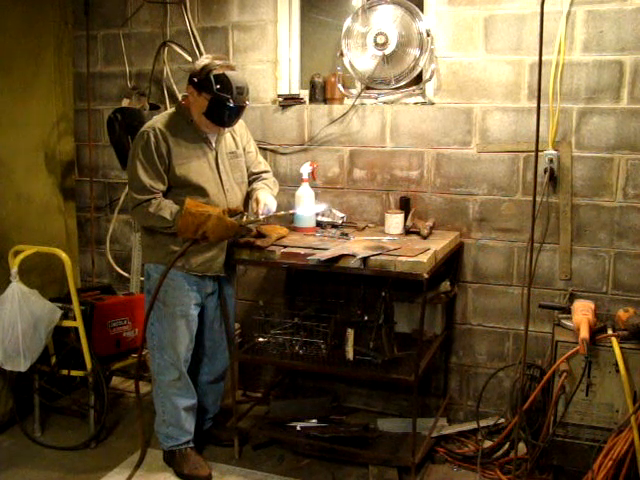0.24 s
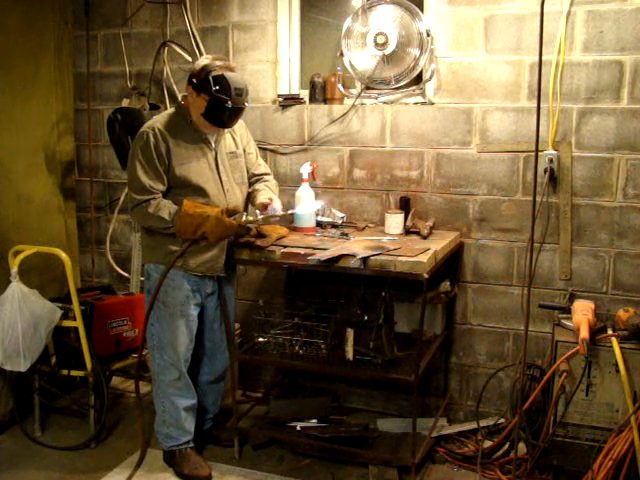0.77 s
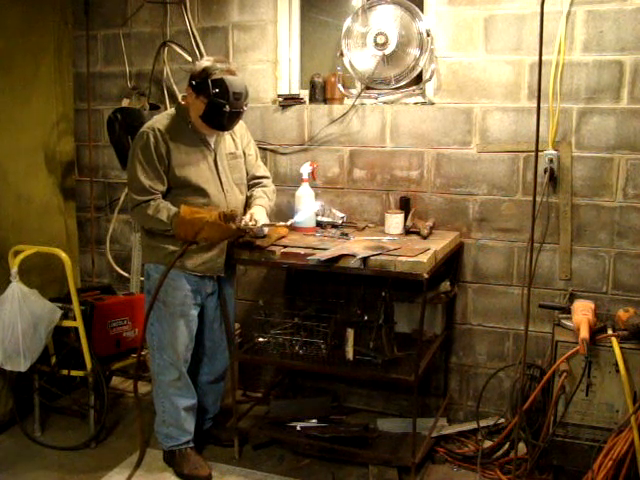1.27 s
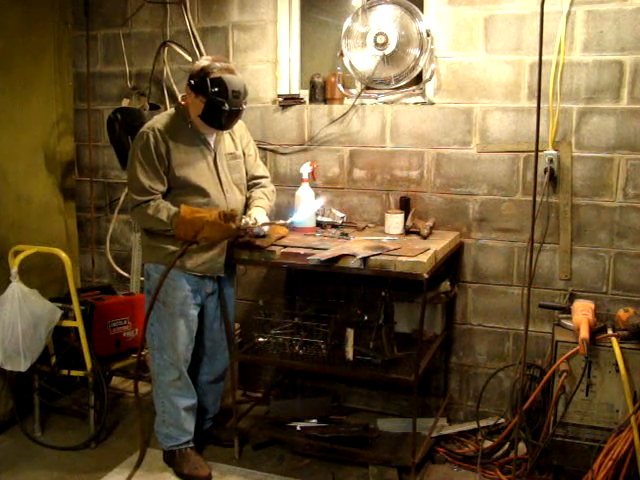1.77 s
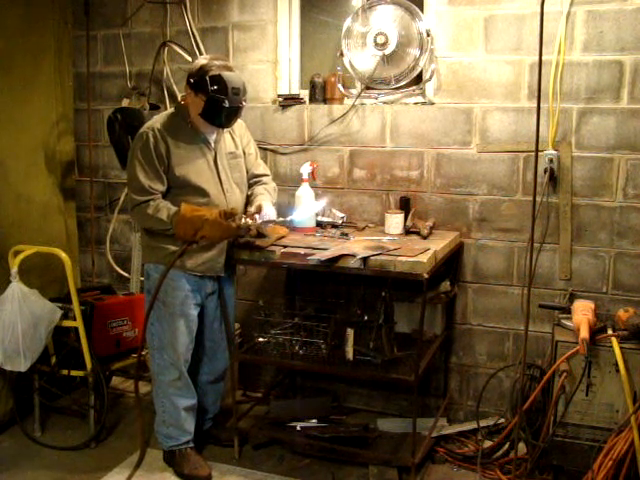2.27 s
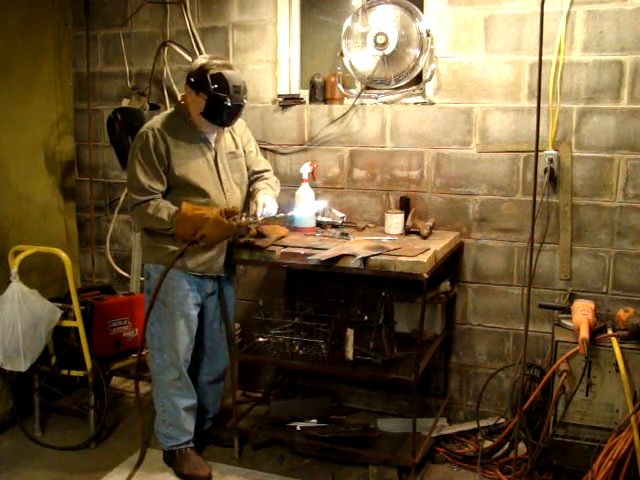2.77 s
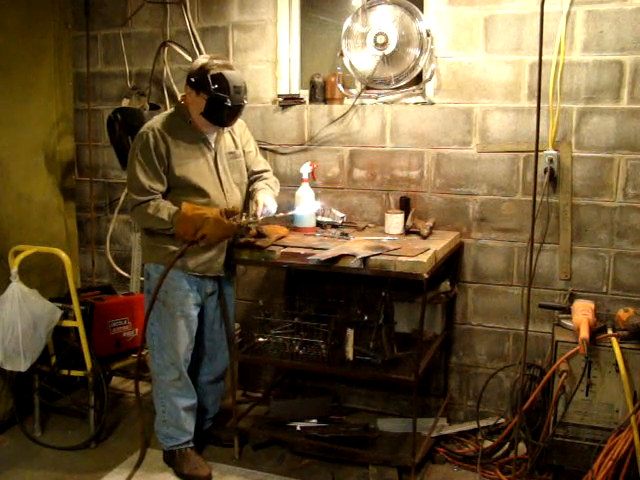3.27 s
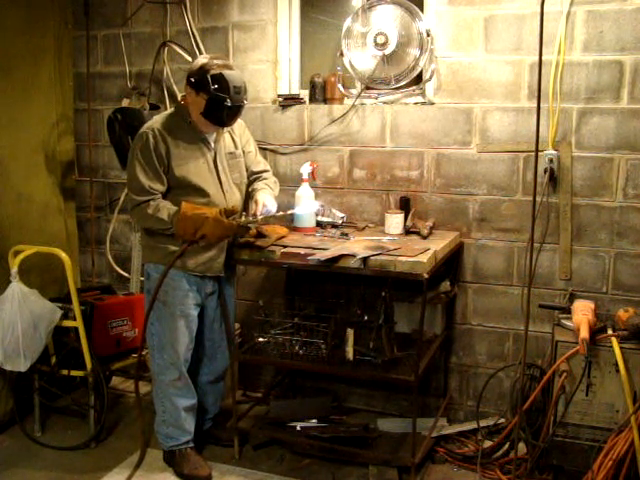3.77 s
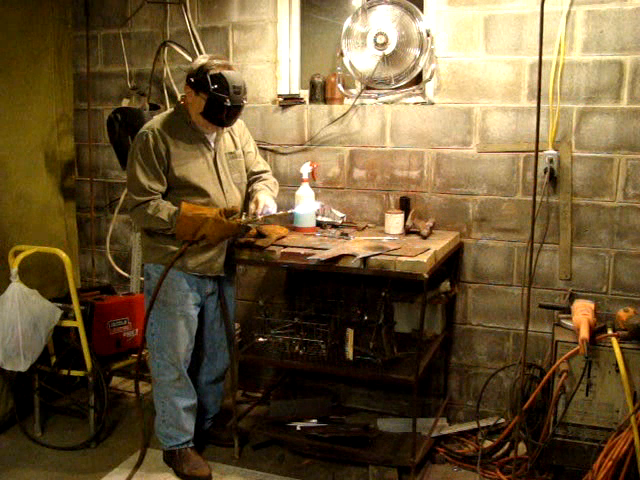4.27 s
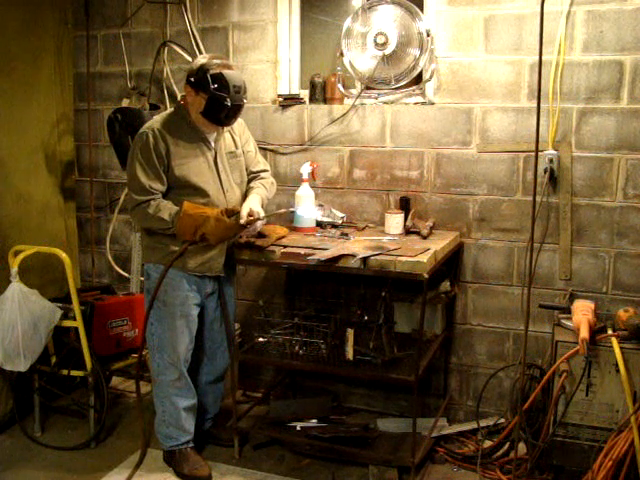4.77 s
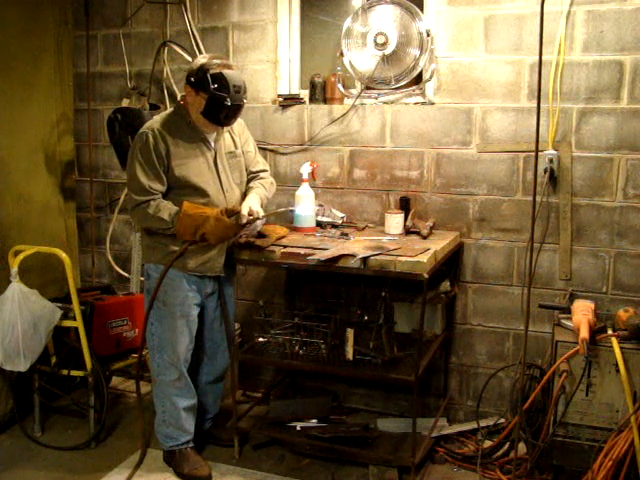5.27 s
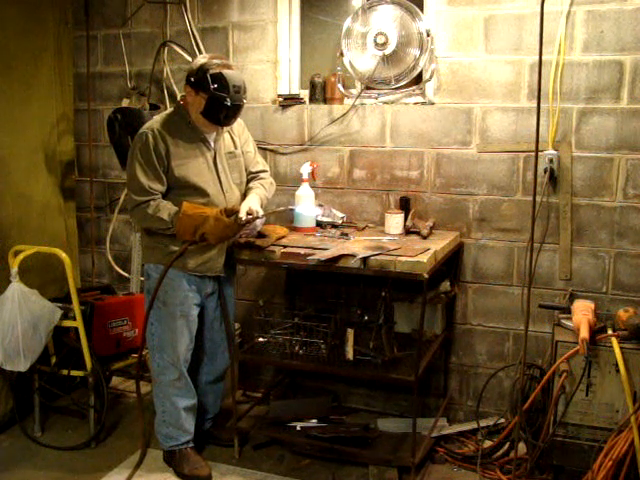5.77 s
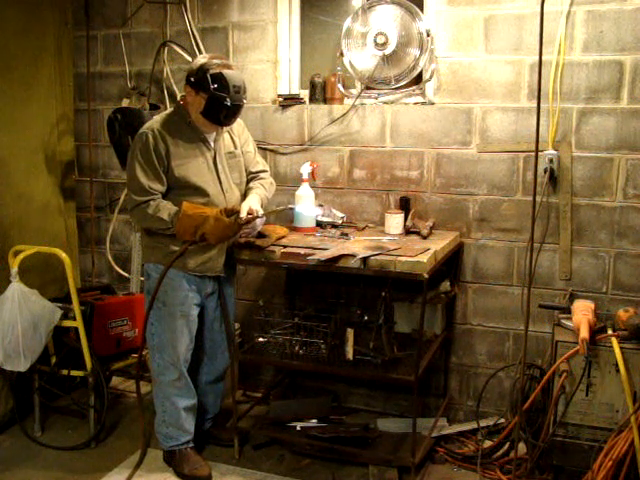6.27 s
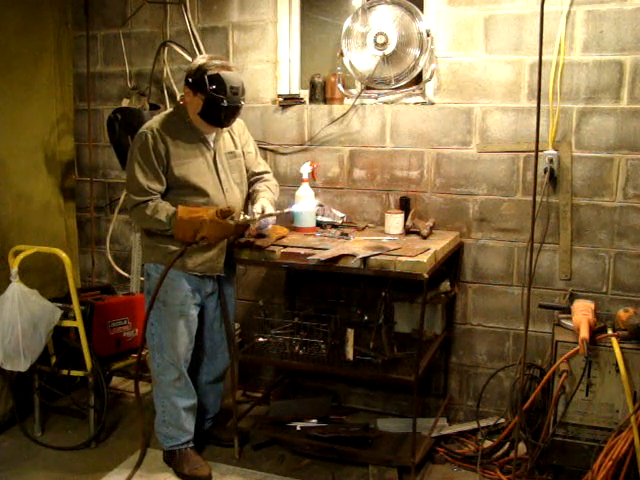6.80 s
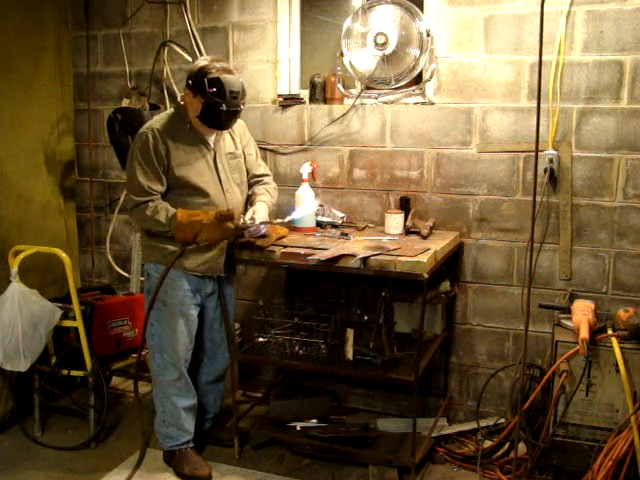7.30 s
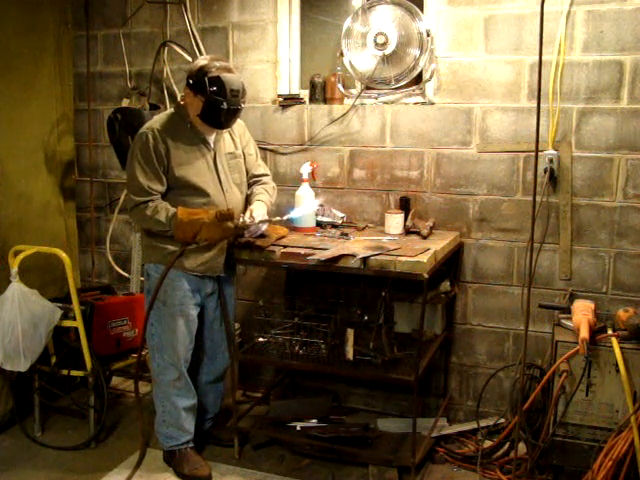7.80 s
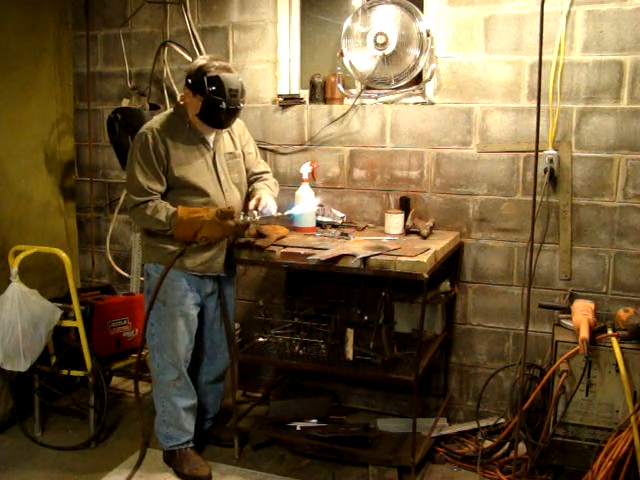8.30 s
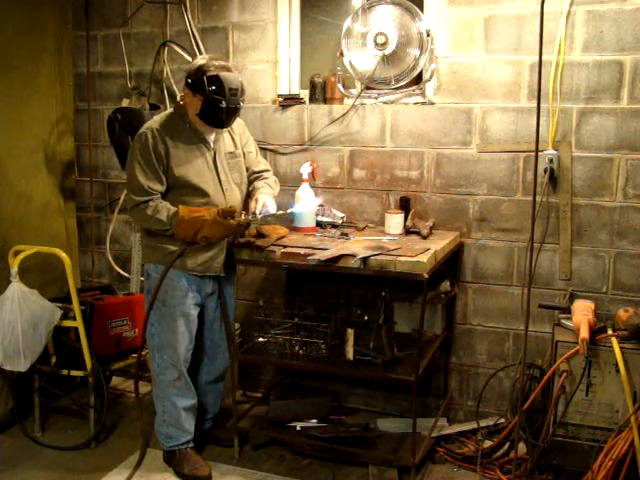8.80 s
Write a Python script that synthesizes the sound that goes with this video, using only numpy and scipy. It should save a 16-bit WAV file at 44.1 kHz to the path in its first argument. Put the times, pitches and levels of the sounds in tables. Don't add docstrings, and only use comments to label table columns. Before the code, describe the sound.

From 0 s a gas torch is already burning: a dense, bright nozzle hiss over a softer mid-range flame roar and little low rumble, wavering gently in level. A window fan sings one thin note near 790 Hz with a faint fluttering edge, clearest at the start, settling in the first two seconds and slowly fading; motor hum is barely present. Between about 3.15 and 3.6 s the flame grows fuller and rougher while the hiss hardly changes. Just before 5.0 s gas leaks briefly, then a harsh broadband blast snaps open until 5.23 s; a cleaner second blast runs from 5.44 to 5.67 s. Both shut abruptly. The steady burn continues, easing slightly toward 8.3 s and lifting again near 9 s. Block walls give short, boxy echoes; the distant camera microphone is nearly mono, dull at the very top, ducking under the blasts and recovering.

```python
import sys
import numpy as np
from scipy import signal
from scipy.fft import rfft, irfft, next_fast_len
from scipy.io import wavfile
from scipy.ndimage import uniform_filter1d, minimum_filter1d

SR = 44100
rng = np.random.default_rng(int(sys.argv[2]) if len(sys.argv) > 2 else 0)


def inscribe(sig):
    pcm = np.round(np.clip(np.atleast_2d(sig).T, -1, 1) * 32767)
    wavfile.write(sys.argv[1], SR, pcm.astype(np.int16))


def gain_from_db(level_db):
    decades = np.asarray(level_db, float) / 20
    return 10 ** decades


N = 399105
BLOCK = 40


def rms_one(x):
    return x / np.sqrt(np.mean(x ** 2) + 1e-20)


def in_time(rows):
    return np.interp(np.arange(N) / SR, *np.transpose(rows))


def rise(start_s, length_s):
    return np.clip((np.arange(N) / SR - start_s) / length_s, 0, 1)


def drift(rate_hz):
    pole = np.exp(-2 * np.pi * rate_hz * BLOCK / SR)
    settle = 2000
    noise = rng.standard_normal(N // BLOCK + 1 + settle)
    return rms_one(signal.lfilter([1], [1, -2 * pole, pole * pole], noise)[settle:])


def smooth_drift(rate_hz):
    return np.interp(np.arange(N) / BLOCK, np.arange(N // BLOCK + 1), drift(rate_hz))


def turbulence(spectrum, shared_db, own_db, rate):
    hz_points, db_points = np.transpose(spectrum)
    octaves = np.log2(hz_points[-1] / hz_points[0])
    edges = hz_points[0] * 2 ** np.arange(0, octaves + .2, 1 / 4)
    white = rng.standard_normal((2, N))
    gust = shared_db * drift(rate)
    out = 0
    for k, (low, high) in enumerate(zip(edges, edges[1:])):
        sos = signal.butter(2, [low, high], "band", fs=SR, output="sos")
        band = signal.sosfilt(sos, white[k % 2])
        level_db = np.interp(np.log(low * high) / 2, np.log(hz_points), db_points)
        gain = gain_from_db(level_db + gust + own_db * drift(rate))
        out = out + np.repeat(gain, BLOCK)[:N] * band
    return rms_one(out)


def basement(x):
    # f/Hz, width/Hz, lift/dB
    room_peaks = [(144, 13, 4.5), (280, 48, 5), (736, 25, -4.5), (497, 120, 6), (656, 66, 10.5),
                  (798, 98, 7.5), (1089, 30, 4.5), (1742, 51, -1), (1910, 110, 0), (2560, 29, 5.5),
                  (4800, 240, 2.5), (620, 15, -4)]
    t60_s, echo_db, stances = .2, -5.5, 9
    size = next_fast_len(N + SR // 2)
    hz = np.fft.rfftfreq(size, 1 / SR)
    lift_db = sum(db / (1 + (2 * (hz - centre) / width) ** 2) for centre, width, db in room_peaks)
    lifted = rfft(x, size) * gain_from_db(lift_db)
    share = hz / np.hypot(hz, 2500)
    t = np.arange(SR // 2) / SR
    after_direct = t > .003
    echoes = rng.standard_normal((stances, len(t))) * gain_from_db(-60 * t / t60_s) * after_direct
    echoes *= gain_from_db(echo_db) / np.linalg.norm(echoes, axis=1, keepdims=True)
    place = np.linspace(0, stances - 1, N) - np.arange(stances)[:, None]
    blend = np.cos(np.pi / 2 * np.clip(place, -1, 1))
    still = irfft(lifted * (1 + (1 - share) * rfft(echoes[0], size)), size)[:N]
    moving = irfft(lifted * share * rfft(echoes, size), size)[:, :N]
    wet = still + np.sum(blend * moving, axis=0)
    return wet * np.std(x) / np.std(wet)


def fan():
    # f/Hz, level/dB
    motor_lines = [(75, -74.5), (178, -71.5)]
    note_hz, blade_hz, waver_hz, blade_db = 788.3, 25, .35, -13
    t = np.arange(N) / SR
    note_db = -30.5 - 5.5 * (1 - np.exp(-t / 1.8)) - 0.26 * t
    flicker_db = 1.5 * smooth_drift(7)
    turn = 2 * np.pi / SR
    phase = turn * np.cumsum(note_hz + waver_hz * smooth_drift(0.28))
    side_gain = gain_from_db(blade_db + 2.5 * smooth_drift(1.1))
    side = side_gain * np.sin(phase + 2 * np.pi * blade_hz * t)
    tones = np.sqrt(2) * gain_from_db(note_db + flicker_db) * (np.sin(phase) + side)
    for hz, db in motor_lines:
        tones += np.sqrt(2) * gain_from_db(db + 4.1 * smooth_drift(1.5)) * np.sin(2 * np.pi * hz * t)
    return tones


def rumble(rumble_db):
    # f/Hz, level/dB per Hz
    air_spectrum = [(12, -34), (60, -24.5), (100, -29.5), (140, -22), (180, -18.5), (225, -16), (300, -9),
                    (390, -10.5), (500, -7), (700, -7), (900, -6.5), (1500, -23)]
    return gain_from_db(rumble_db + 3.5) * turbulence(air_spectrum, shared_db=0.73, own_db=0.14, rate=9.4)


def torch(roar_db, hiss_db):
    # f/Hz, level/dB per Hz
    roar_spectrum = [(300, -28.5), (700, -13.5), (1100, -3), (1900, 0), (2600, -6), (3600, -4.5),
                     (5000, -21), (9000, -9.5)]
    # f/Hz, level/dB per Hz
    hiss_spectrum = [(1500, -47.5), (2500, -12.5), (3600, -5.5), (5000, -0.5), (5800, 4), (6700, 1),
                     (7700, 1.5), (8800, 5), (10000, 8.5), (12500, -6.5)]
    roar = gain_from_db(roar_db + 6.5) * turbulence(roar_spectrum, shared_db=-0.35, own_db=.5, rate=5.0)
    hiss = gain_from_db(hiss_db + 9.0) * turbulence(hiss_spectrum, shared_db=0.17, own_db=0.6, rate=32.0)
    return roar + hiss


def blast():
    # f/Hz, level/dB per Hz
    jet_spectrum = [(500, -28), (800, -18.5), (1200, -5.5), (2000, -3), (4000, -1), (6000, -1),
                    (9000, -2.5), (10500, -0.5)]
    # opens t/s, shuts t/s, jet level/dB, leak level/dB
    presses = [
        (5.022, 5.232, -20, -29),
        (5.438, 5.669, -20.5, -48.5),
    ]
    slack_s, open_s, swell_db_s, shut_db_s = .08, .011, 4, 480
    noise = turbulence(jet_spectrum, shared_db=0.7, own_db=-0.1, rate=29.0)
    gain, opened = np.zeros(N), np.zeros(N)
    t = np.arange(N) / SR
    for opens, shuts, jet_db, leak_db in presses:
        valve = rise(opens, open_s)
        swell_db = swell_db_s * (np.clip(t, opens, shuts) - opens)
        fall_db = shut_db_s * np.maximum(t - shuts, 0) - swell_db
        leak = rise(opens - slack_s, slack_s) * gain_from_db(leak_db)
        gain += valve * gain_from_db(jet_db - fall_db) + (1 - valve) * leak
        opened += valve * gain_from_db(-fall_db / 4)
    return gain_from_db(8.5) * gain * noise, opened


def scene():
    # t/s, level/dB about the mean
    slow_level = [(0, -0.9), (.6, 1.3), (1.7, 1), (2.6, -0.7), (3.3, -0.6), (4.1, 0.2), (4.9, 0.5), (6.4, -0.3),
                  (7.4, -1.1), (8.3, -1.4), (8.9, 0.3), (9.05, 0.3)]
    slow_level_db = in_time(slow_level)
    oxygen = rise(3.15, 0.48)
    jet, opened = blast()
    quench_db = -2.5 * opened
    air = rumble(-43 + slow_level_db + 3 * oxygen + quench_db)
    flame = torch(roar_db=-36.5 + 1.06 * slow_level_db + 4 * oxygen, hiss_db=-28.5 + slow_level_db + 0.5 * oxygen)
    mono = basement(flame + jet + air) + fan()
    return np.array([mono, mono])


def band_of(x, low_hz, high_hz):
    size = next_fast_len(x.shape[-1])
    hz = np.fft.rfftfreq(size, 1 / SR)
    return irfft(rfft(x, size) * ((hz > low_hz) & (hz < high_hz)), size)[..., :x.shape[-1]]


def mute(x, bands, excess_db, left_db, size):
    hz, s, frames = signal.stft(x, SR, nperseg=size)
    excess = np.interp(s, np.arange(N) / SR, excess_db)
    for low_hz, high_hz, chance, per_db in bands:
        cut = rng.random(len(s)) < chance + per_db * excess
        frames[(hz >= low_hz) & (hz < high_hz)] *= gain_from_db(left_db * cut)
    return signal.istft(frames, SR, nperseg=size)[1][:N]


def camera_channels(mono, excess_db):
    # low f/Hz, high f/Hz, chance at rest, extra chance per dB of overload
    gappy = [(0, 50, .52, .12), (50, 92, .27, .1), (92, 140, .58, .12), (140, 165, .05, .16),
             (190, 250, .02, .25)]
    # t/s, centre f/Hz, level/dB
    splits = [(.4, 4660, -38), (1.75, 5320, -36), (3.93, 7570, -34), (3.98, 6880, -34), (4.35, 6270, -35),
              (4.35, 8920, -30.5), (4.63, 4700, -37), (5.53, 5690, -31), (5.53, 8590, -26),
              (7.3, 8220, -29), (8.3, 5120, -36)]
    # f/Hz, level/dB
    roll_off = [(9900, 0), (10000, -4), (10080, -12), (10130, -20), (10180, -45), (10240, -90)]
    low, top, step, per_db = 4900, 10200, 600, .01
    holes = [(hz, hz + step, .03, per_db) for hz in range(low, top - step, step)]
    holes.append((top - step, top, .07, per_db))
    mono = mute(mono, gappy, excess_db, left_db=-60, size=4096)
    mono = mute(mono, holes, excess_db, left_db=-18, size=768)
    side = np.zeros(N)
    frame = np.sin(np.pi * np.arange(2048) / 2048) ** 2
    for s, hz, db in splits:
        at = round(s * SR) - 1024
        noise = band_of(rng.standard_normal(2048), hz / 1.1, hz * 1.1)
        side[at:at + 2048] += gain_from_db(db) * frame * rms_one(noise)
    size = next_fast_len(N)
    edge = gain_from_db(np.interp(np.fft.rfftfreq(size, 1 / SR), *np.transpose(roll_off)))
    return irfft(rfft([mono + side, mono - side], size) * edge, size)[:, :N]


def low_pass(x):
    return signal.sosfilt(signal.butter(12, 11300, fs=SR, output="sos"), x)


def record(dry):
    duck_from_db, slope, attack_s, hold_s, back_db_s = -22.5, 0.58, 0.037, 0.05, 15
    level_db = 10 * np.log10(uniform_filter1d(dry[0] ** 2, size=1024) + 1e-12)
    excess_db = np.maximum(level_db - np.median(level_db) - 4.5, 0)
    hold = 2 * round(hold_s * SR / 2) + 1
    held = -minimum_filter1d(-level_db, hold, origin=hold // 2)
    ramp = back_db_s * np.arange(N) / SR
    peak = np.maximum.accumulate(slope * (held - duck_from_db) + ramp)
    over = np.maximum(peak - ramp, 0)
    pole = np.exp(-1 / (attack_s * SR))
    duck_db = signal.lfilter([1 - pole], [1, -pole], over)
    mix = camera_channels(dry[0] * gain_from_db(-duck_db), excess_db)
    return low_pass(mix)


dry = scene()
out = record(dry)
inscribe(out)
```